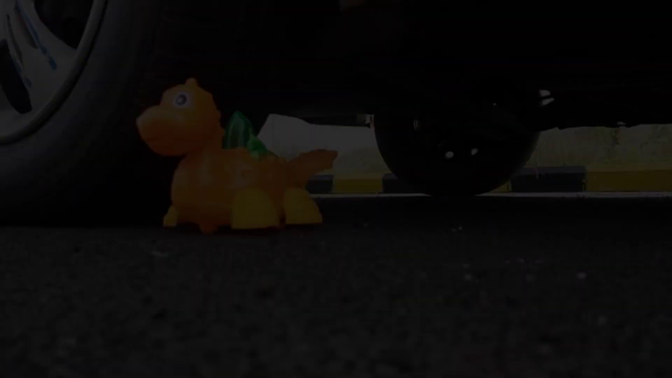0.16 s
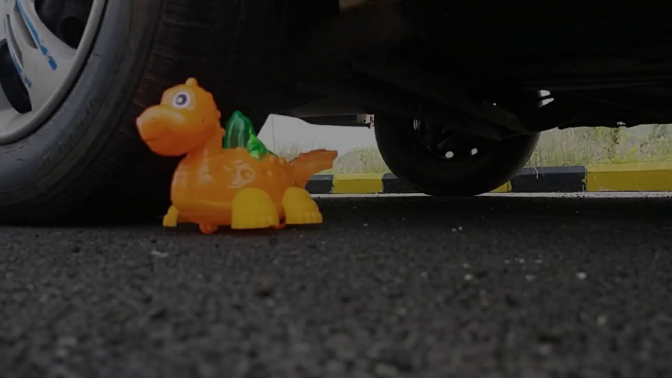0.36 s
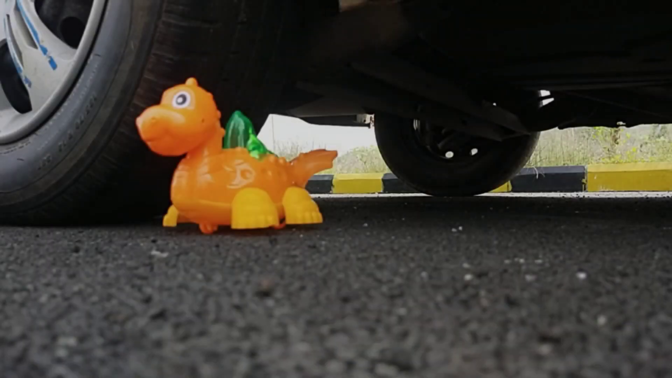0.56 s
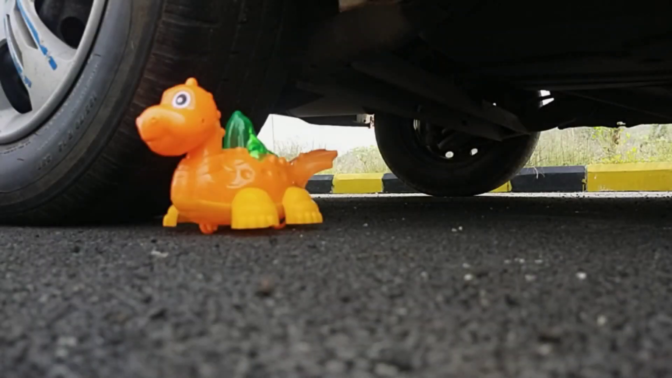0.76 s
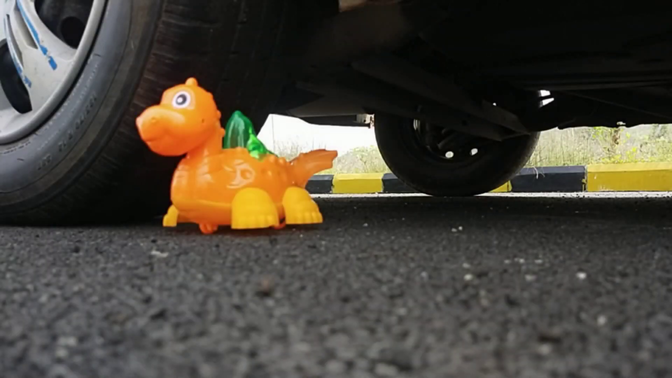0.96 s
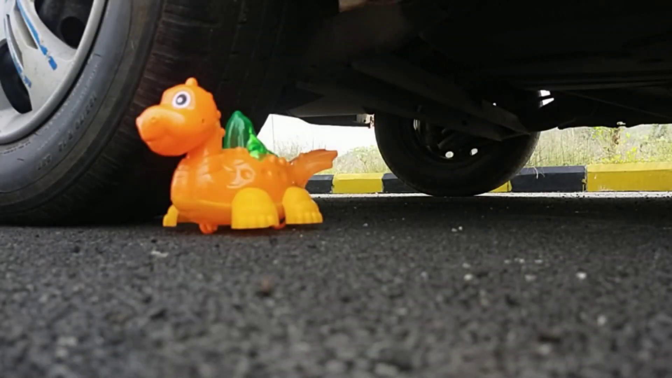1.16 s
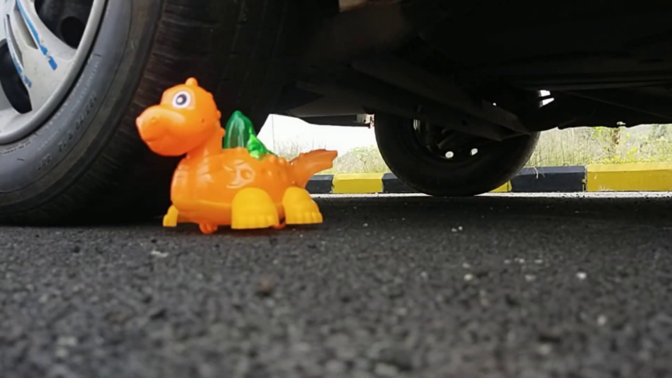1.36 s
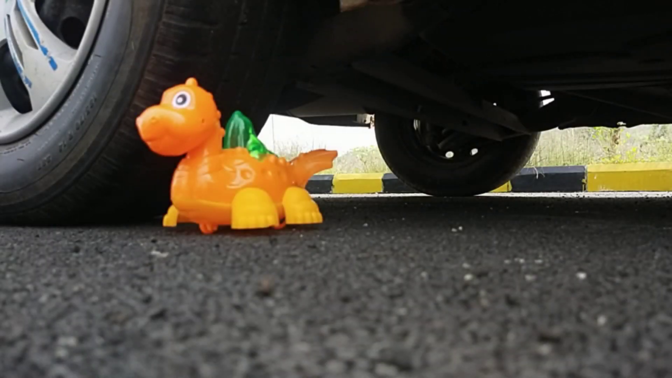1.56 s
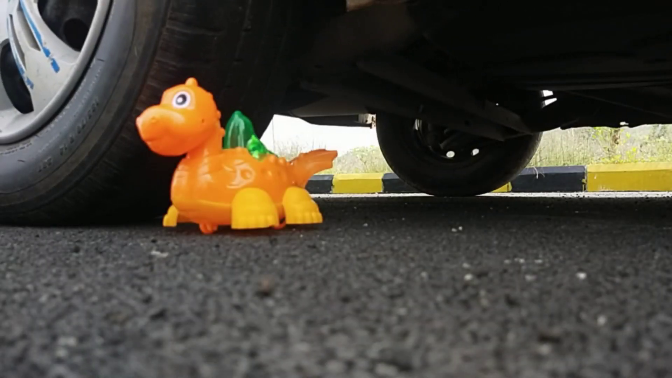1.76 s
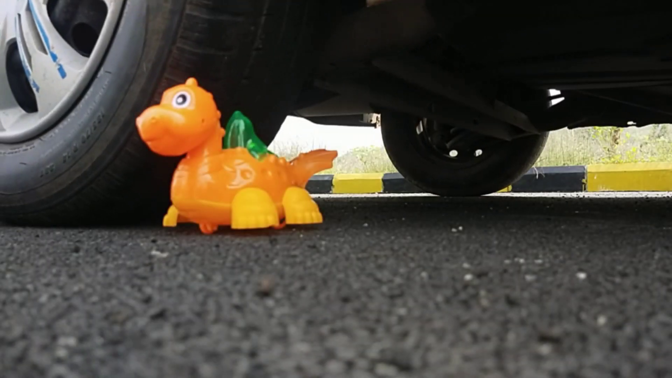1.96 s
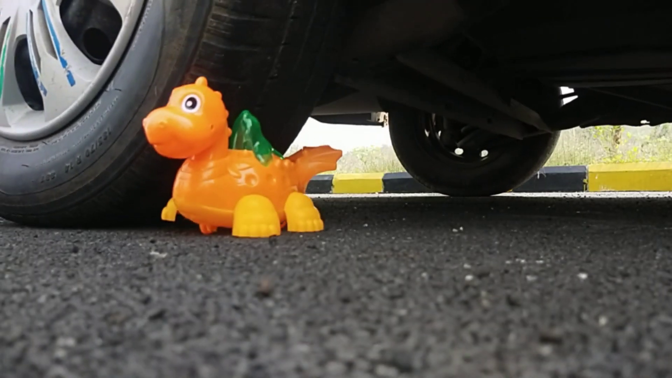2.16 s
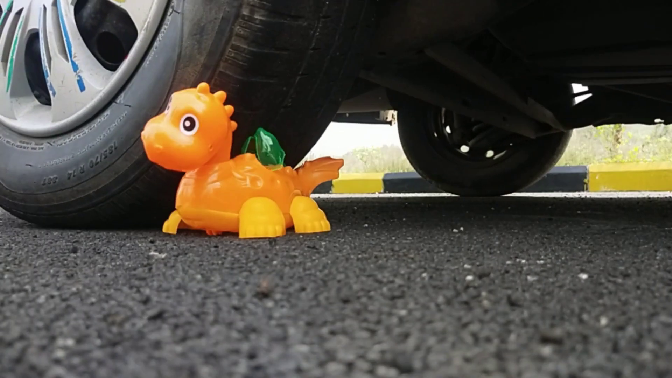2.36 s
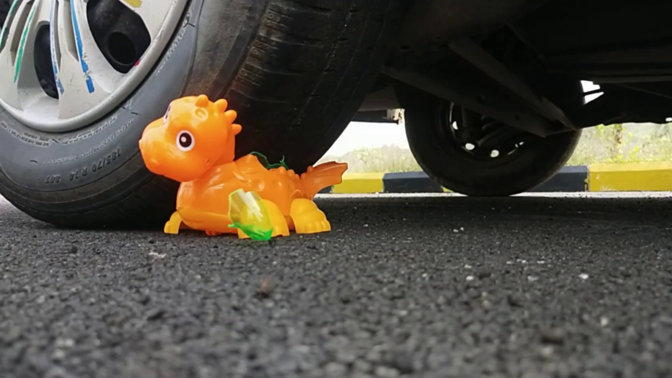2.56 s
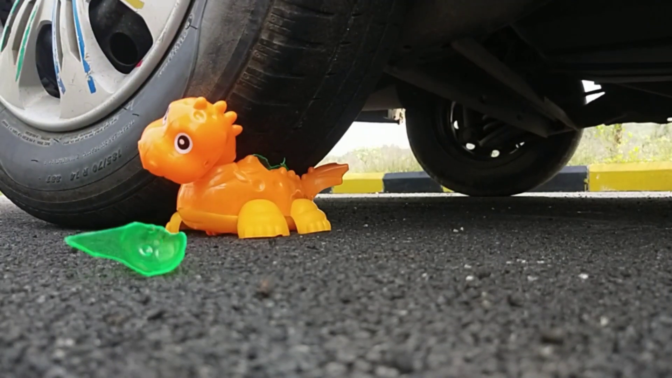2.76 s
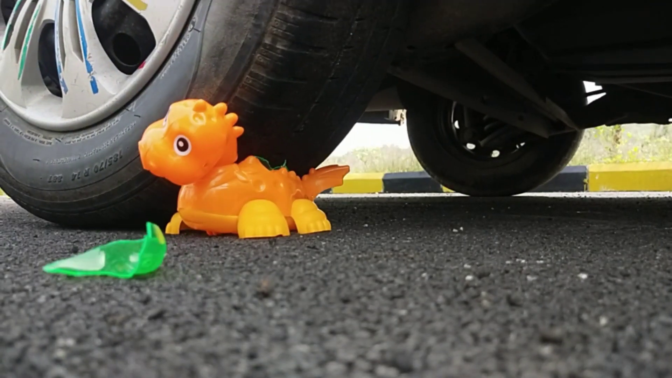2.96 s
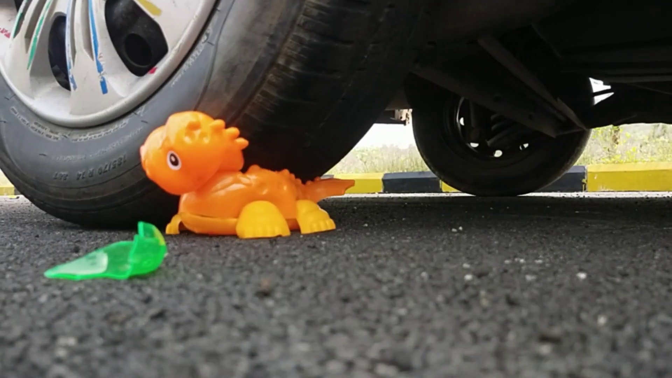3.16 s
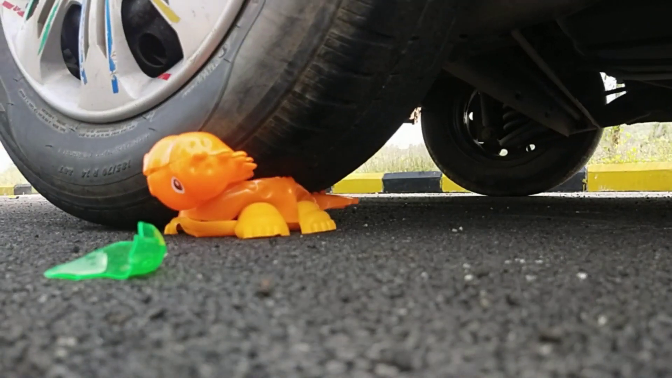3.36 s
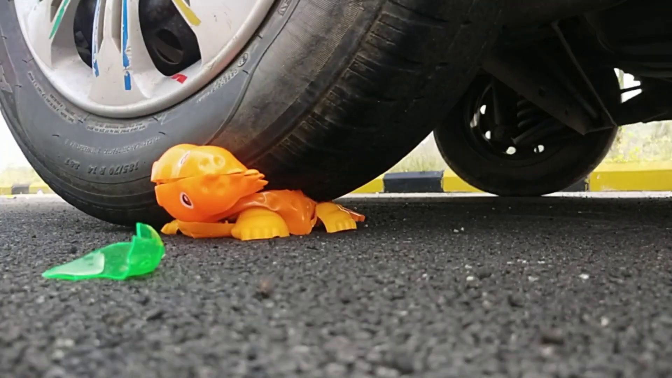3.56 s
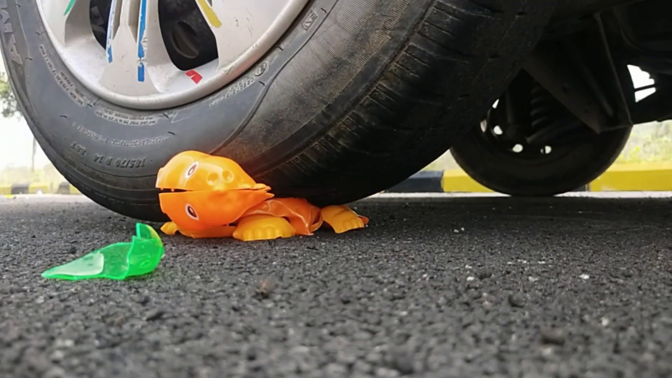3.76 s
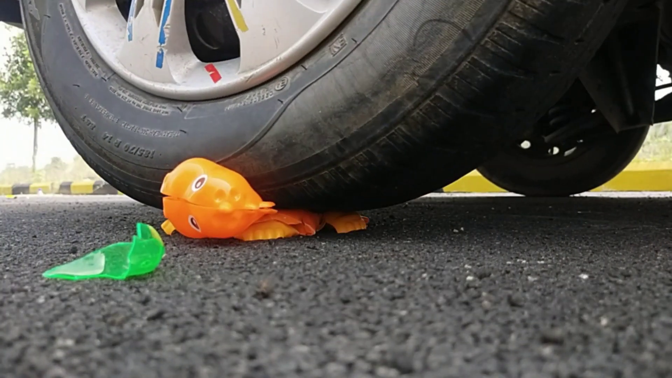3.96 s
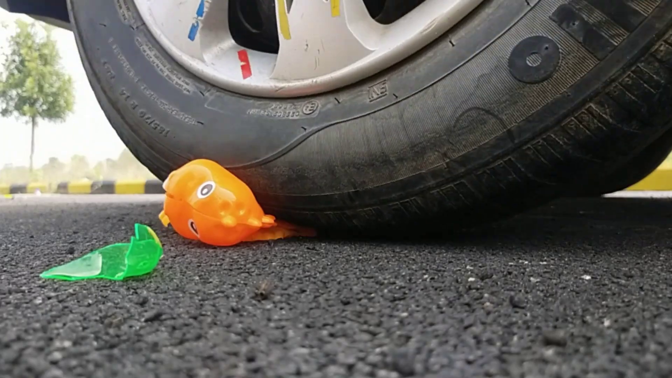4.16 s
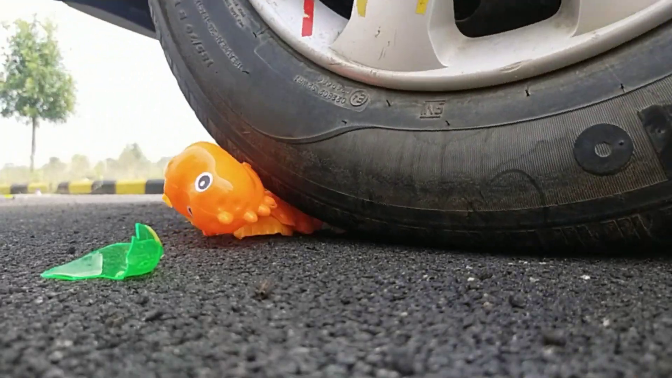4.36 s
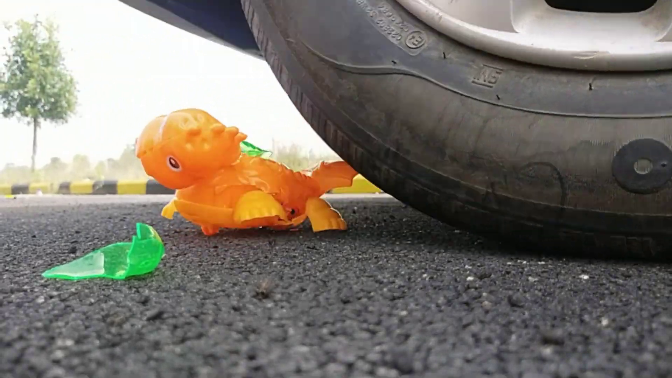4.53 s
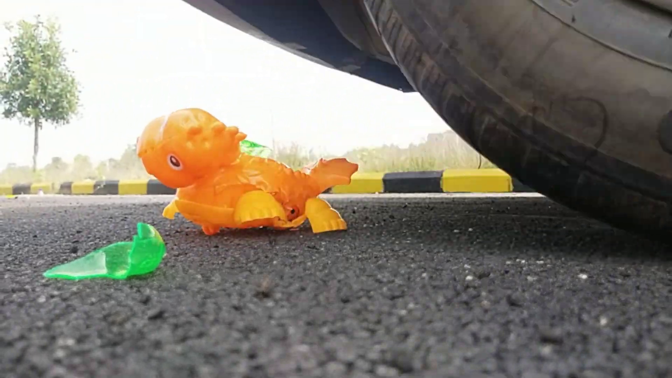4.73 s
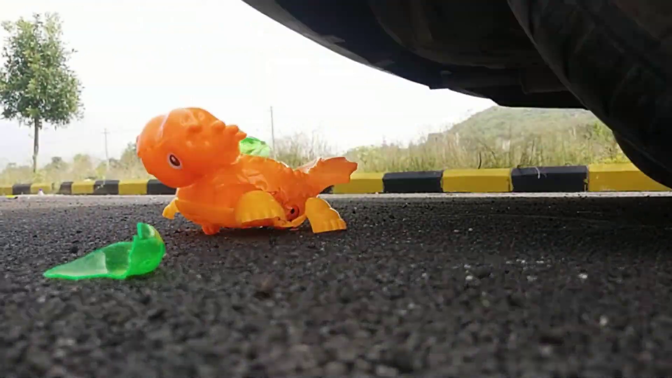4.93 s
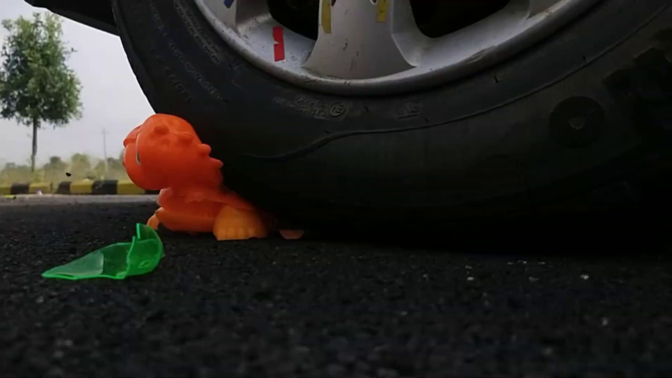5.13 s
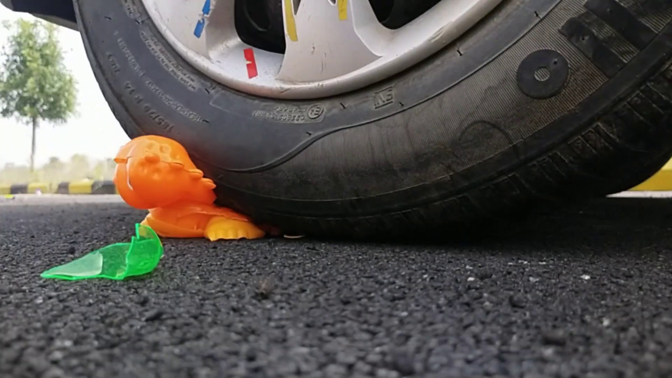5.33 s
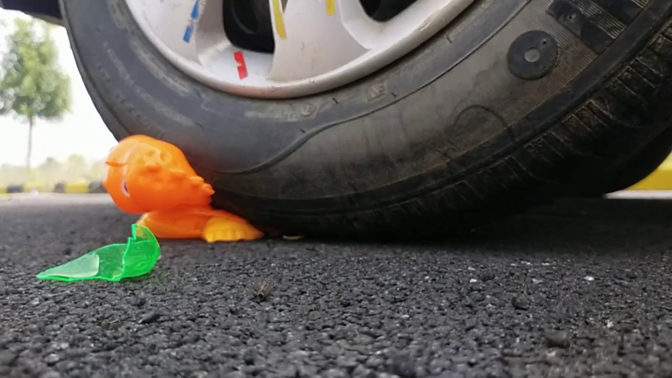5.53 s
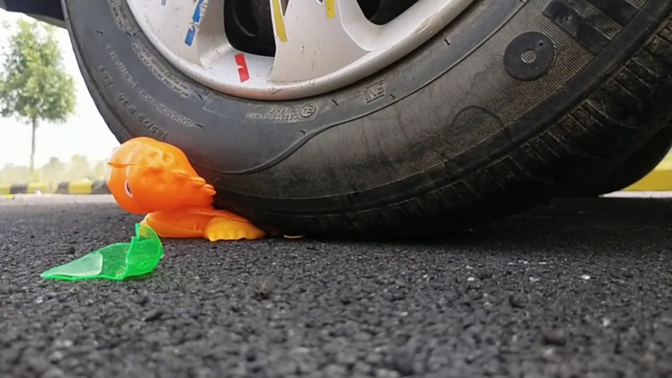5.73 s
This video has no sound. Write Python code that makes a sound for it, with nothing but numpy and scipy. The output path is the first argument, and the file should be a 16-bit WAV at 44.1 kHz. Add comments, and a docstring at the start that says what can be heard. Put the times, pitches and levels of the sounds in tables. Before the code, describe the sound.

An idling car engine fades in with a quiet rumble and clatter. A tyre then rolls over a hollow plastic toy, which breaks in a long run of sharp cracks and crunches, with soft tyre thuds and a shard skittering over the asphalt. The sound drops out for a moment, then returns with a few more cracks over the engine. It is heard outdoors from ground level, close to the toy.

```python
"""An idling four-cylinder car engine fades in, rumbling and clattering. From about 2.2 s a tyre rolls
over a hollow plastic toy: the shell cracks, creaks and crunches, ringing in its modes, the tyre thuds
down, and a shard skitters off over the asphalt. The engine's level dips behind the cracks and jumps
back; everything fades out briefly near 5.2 s. Heard from the ground by two spaced microphone ports."""
import sys
import numpy as np
from scipy import signal
from scipy.fft import rfft, irfft, next_fast_len
from scipy.io import wavfile
from scipy.ndimage import uniform_filter1d

SR = 44100
rng = np.random.default_rng(int(sys.argv[2]) if len(sys.argv) > 2 else 0)


def unload_wav(signal):
    """Save mono or channel-first audio to the path in sys.argv[1] as 16-bit WAV at rate SR, clipped to [-1, 1]."""
    wavfile.write(
        sys.argv[1],
        SR,
        np.round(np.clip(np.atleast_2d(signal).T, -1, 1) * 32767).astype(np.int16),
    )


N = 255339
TIME_S = np.arange(N) / SR


def from_db(db):
    """Level to amplitude gain."""
    return 10 ** (np.asarray(db) / 20)


def unit_rms(x):
    """Scale to rms 1."""
    return x / np.sqrt(np.mean(x ** 2) + 1e-20)


def curves(rows):
    """Interpolate rows of (seconds, values..) to every sample."""
    times_s, *columns = np.transpose(rows)
    return [np.interp(TIME_S, times_s, column) for column in columns]


def db_at(spectrum, hz):
    """Read rows of (Hz, dB) on a log frequency axis."""
    points_hz, points_db = np.transpose(spectrum)
    return np.interp(np.log(hz), np.log(points_hz), points_db)


def nearness(hz, centre_hz, log_width):
    """Bell curve on log frequency, 1 at the centre."""
    return np.exp(-(np.log(hz / centre_hz) / log_width) ** 2)


def ring(force, hz, t60_s):
    """One damped mode: a unit click rings at height 1."""
    r = from_db(-60 / (t60_s * SR))
    w = 2 * np.pi * min(hz, .45 * SR) / SR
    denormal_guard = 1e-18 * (np.arange(force.shape[-1]) % 3)
    return signal.lfilter([1, 0, -1], [1, -2 * r * np.cos(w), r * r], force + denormal_guard) / 2


def swell(clicks, rise_s):
    """Spread each click into a soft rise and fall."""
    r = np.exp(-1 / (rise_s * SR))
    return signal.lfilter([1], [1, -2 * r, r * r], clicks)


def stereo_noise(shape, correlation):
    """Left and right white noise with a shared part."""
    mid, side = rng.standard_normal((2, 1) + shape)
    correlation = np.clip(correlation, 0, 1)
    mid, side = np.sqrt(1 + correlation) * mid, np.sqrt(1 - correlation) * side
    return np.concatenate([mid + side, mid - side]) / np.sqrt(2)


# Engine timing. Each row: start in seconds, time of one loudest knock in seconds, cycle in seconds.
FIRING_CYCLES = [(0, .953, .1008), (2.6, 2.766, .1008), (4.0, 4.056, .1008), (4.6, 4.851, .098),
                 (5.2, 5.686, .1008)]
# Each entry: one cylinder's level in dB, in firing order.
CYLINDER_LEVELS_DB = [0, -6, -8, -3.5]

def firings():
    """One click per firing, four to a cycle, slightly uneven in time and strength."""
    train = np.zeros(N)
    ends_s = [row[0] for row in FIRING_CYCLES[1:]] + [N / SR]
    for (start_s, knock_s, cycle_s), end_s in zip(FIRING_CYCLES, ends_s):
        step_s = cycle_s / 4
        k = np.arange(np.ceil((start_s - knock_s) / step_s), (end_s - knock_s) / step_s - 1).astype(int)
        jitter_s, scatter_db = (rng.standard_normal((len(k), 2)) * [.0008, .7]).T
        at = ((knock_s + k * step_s + jitter_s) * SR).astype(int)
        train[np.clip(at, 0, N - 1)] = from_db(np.array(CYLINDER_LEVELS_DB)[k % 4] + scatter_db)
    return train


# Each row: frequency in Hz, left minus right in dB.
ENGINE_BALANCE = [(60, -3), (180, -1), (550, -0.5), (1650, -9), (4970, -9), (15000, -5.5)]
ENGINE_CORRELATION, ENGINE_LAG_SAMPLES = 0.85, 22

def engine_colour(noise, spectrum):
    """Lay a spectrum and the engine's stereo balance on noise; rms 1."""
    size = next_fast_len(N, True)
    hz = np.maximum(np.fft.rfftfreq(size, 1 / SR), 1)
    balance_db = db_at(ENGINE_BALANCE, hz) / 2 * [[1], [-1]]
    shaped = rfft(noise, size) * from_db(db_at(spectrum, hz) + balance_db)
    return unit_rms(irfft(shaped, size)[:, :N])


# Each row: frequency in Hz, relative spectral density in dB.
RUMBLE_SPECTRUM = [(15, -53.5), (25, -7.5), (87, 0), (193, 1), (277, -10.5), (668, -1.5), (784, -12.5),
                   (1460, -20), (1610, -41), (2310, -45), (3000, -44), (3900, -67), (6600, -120)]

def rumble(throb):
    """Low noise that throbs gently with the firings."""
    noise = stereo_noise((N,), ENGINE_CORRELATION)
    return from_db(-3.5) * engine_colour(noise * (1 + 0.17 * throb), RUMBLE_SPECTRUM)


# Each row: frequency in Hz, relative spectral density in dB.
CLATTER_SPECTRUM = [(240, -38), (400, -2.5), (669, 0), (899, -3.5), (1460, -6), (1620, -14), (2360, -17),
                    (3120, -19.5), (4190, -16.5), (5640, -27), (7010, -20.5), (8450, -39.5), (14600, -38),
                    (15500, -41), (16500, -85)]

def clatter(train, throb):
    """Metallic noise in bursts; the treble follows mainly the loudest knock."""
    knock = unit_rms(swell(train ** 2, rise_s=.007))
    metal = stereo_noise((N,), ENGINE_CORRELATION)
    treble = signal.sosfilt(signal.butter(2, 5200, "high", fs=SR, output="sos"), metal)
    bursts = (metal - treble) * (0.54 + 0.5 * throb + 0.5 * knock) + treble * (1.02 + 0.63 * knock)
    return from_db(-9.5) * engine_colour(bursts, CLATTER_SPECTRUM)


# Each row: frequency in Hz, nominal width in Hz, relative level in dB, exponent on the drive.
PIPE_MODES = [(110.5, 29.5, -12, 1.21), (182.7, 86, -11, 0.052), (1252, 45, -22, 1.47)]

def exhaust(train, throb, drive):
    """Gas flow and firings ring the pipe: low modes hum on, high ones chug."""
    flow, out = stereo_noise((N,), ENGINE_CORRELATION), 0
    for hz, width_hz, db, exponent in PIPE_MODES:
        puffs = flow * (1.5 + hz / 500 * throb) + 8 * train
        out += from_db(db) * drive ** exponent * unit_rms(ring(puffs, hz, 2.84 / width_hz))
    return out


# Each row: frequency in Hz, nominal width in Hz, relative level in dB, cylinder contrast exponent.
BLOCK_MODES = [(1400, 300, -24, 2.2), (2300, 350, -29, .5), (3950, 240, -35, 1.8)]

def engine_block(train):
    """Each firing is a short rasp coloured by the block's resonances."""
    out = 0
    for hz, width_hz, db, contrast in BLOCK_MODES:
        rasp = swell(train ** contrast, rise_s=.0028) * stereo_noise((N,), ENGINE_CORRELATION)
        out += from_db(db) * unit_rms(ring(rasp, hz, 2.5 / width_hz))
    return out


# Each row: start in seconds, end in seconds, depth at mid-dip in dB.
LEVEL_DIPS = [(2.165, 2.278, 7), (2.37, 2.414, 14), (2.417, 2.553, 13.5), (2.558, 2.609, 15.5),
              (2.672, 2.749, 10.5), (2.995, 3.101, 17.5), (3.098, 3.156, 15), (3.208, 3.334, 11),
              (3.339, 3.42, 11), (3.426, 3.516, 15.5), (3.512, 3.62, 3), (3.634, 3.68, 9.5),
              (3.7, 3.721, 14), (3.707, 3.824, 9), (3.816, 3.92, 8.5), (3.954, 3.997, 11), (4.2, 4.252, 10),
              (5.491, 5.542, 11)]
SAG_DB_PER_S = 34

def level_dips():
    """Attenuation in dB: each dip deepens as it lasts, then the level jumps back."""
    dip_db = np.zeros(N)
    for start_s, end_s, depth_db in LEVEL_DIPS:
        inside = (TIME_S >= start_s) & (TIME_S < end_s)
        dip_db += inside * (depth_db + SAG_DB_PER_S * (TIME_S - (start_s + end_s) / 2))
    return uniform_filter1d(dip_db, size=90)


# Each row: time in seconds, overall gain in dB, extra clatter and block gain in dB, exhaust drive in dB.
ENGINE_LEVELS = [(0, -40, 4, 6), (.8, -41, 4.5, -0.5), (2.15, -41, 4.5, 0.5), (2.75, -38, 7.5, 1),
                 (2.9, -36, 2, 2.5), (3.0, -29, -1.5, -9), (3.18, -32, -1, 1), (3.6, -37, 5, 1),
                 (4.0, -32, -4, -9), (4.2, -33.5, -1.5, 3), (4.27, -34, -0.5, 3.5), (4.65, -47, 8.5, 16.5),
                 (5.05, -46.5, 9.5, 13), (5.25, -49.5, 11, 7), (5.4, -42.5, 13, 10.5), (5.6, -43.5, 9, 9),
                 (5.7, -36, 2.5, -1)]

def engine(dip_db):
    """The engine as the car rolls; clatter, block and exhaust dip less than the rumble."""
    gain_db, clatter_db, drive_db = curves(ENGINE_LEVELS)
    train = firings()
    throb = unit_rms(swell(train, rise_s=.0048))
    low, metal = rumble(throb), clatter(train, throb)
    pipe = exhaust(train, throb, drive=from_db(drive_db + 0.11 * dip_db))
    metal = from_db(clatter_db + 0.31 * dip_db) * (metal + engine_block(train))
    left, right = from_db(gain_db - dip_db) * (low + metal + pipe)
    return np.array([np.roll(left, ENGINE_LAG_SAMPLES), right])  # the right port is nearer


# Each row: frequency in Hz, left minus right in dB.
TOY_BALANCE = [(60, 2.5), (180, 1), (550, 0.0), (1650, -1), (4970, 0.5), (15000, 4)]

def toy_ports(hz):
    """Correlation and gains at the two ports for a sound from the toy."""
    return .7 - hz / 15000, from_db(db_at(TOY_BALANCE, hz) / 2 * np.array([[1], [-1]]))


def strikes(times_s, levels_db, modes, weight_db, snap_s, rattle_s, rattle_db, pan_db=0, size=1500):
    """Each blow, a short snap with a grainy rattle, drives every mode with its own strength."""
    count, lead = len(times_s), 220  # samples ahead of the snap
    t, hit = (np.arange(size) - lead) / SR, slice(lead, lead + 500)
    grain = from_db(4 * np.minimum(rng.exponential(1, (count, size)), 4) - 8)
    rattle = from_db(rattle_db).reshape(-1, 1) * np.exp(-np.maximum(t / rattle_s, -t / 0.0012)) * grain
    snap = np.maximum(t, 0) / snap_s * np.exp(1 - t / snap_s)
    snap *= np.sqrt(np.sum(snap ** 2)) / np.sum(snap)
    sides, out = np.array([[[1]], [[-1]]]), np.zeros((2, N))
    for hz, mode_db, t60_s in modes:
        correlation, port_gains = toy_ports(hz)
        phase, polarity, scatter = rng.standard_normal((count, 3)).T
        skew = np.arccos(np.clip(correlation, 0, 1)) / 2 * phase[:, None] * sides  # ports out of step
        blows = stereo_noise(rattle.shape, correlation) * rattle / (1 + hz / 6000)
        carrier = np.sign(polarity[:, None]) * np.cos(2 * np.pi * hz * t[hit] + skew)
        blows[..., hit] += 2 * snap[hit] * carrier
        blows *= from_db(sides * pan_db / 2)
        gains = from_db(levels_db + mode_db + weight_db(hz) + 1.86 * scatter)
        force = np.zeros((2, N + 2 * size))
        for k, start_s in enumerate(times_s):
            at = int(start_s * SR + 12 * abs(polarity[k]))  # modes start slightly apart
            force[:, at:at + size] += gains[k] * blows[:, k]
        out += port_gains * ring(force[:, lead:N + lead], hz, t60_s)
    return out


# Each row: start in seconds, relative level in dB.
TYRE_DROPS = [(2.286, -21), (2.352, -24), (3.024, -20), (3.094, -12.5), (3.922, -23), (3.935, -13.5)]
# Each row: frequency in Hz, relative level in dB, t60 in seconds.
TYRE_MODES = [(115, 2, 0.017), (246, 0, 0.019)]

def tyre_thuds():
    """The tyre drops a little as the toy gives way."""
    times_s, levels_db = np.transpose(TYRE_DROPS)
    return strikes(times_s, levels_db, TYRE_MODES, lambda hz: -21,
                   snap_s=0.00066, rattle_s=.005, rattle_db=-30)


def creak(peak_s=4.184, sigma_s=0.0081, sweep_hz=(520, 848), peak_db=-35):
    """The squeezed shell slips on the rubber, quicker and quicker."""
    sigmas = (TIME_S - peak_s) / sigma_s
    hz = np.interp(sigmas, [-2, 2], sweep_hz)
    return from_db(peak_db) * np.exp(-sigmas ** 2 / 2) * np.sin(2 * np.pi * np.cumsum(hz) / SR)


# Each row: start in seconds, relative level in dB, favoured frequency in Hz.
SHARD_LANDINGS = [(2.511, -34.5, 4270), (2.549, -25, 3340), (2.607, -25, 4230), (2.751, -29, 14300),
                  (2.771, -23.5, 4270), (2.824, -29.5, 8300)]
# Each row: frequency in Hz, relative level in dB, t60 in seconds.
SHARD_MODES = [(1591, -9, 0.16), (2980, -12, 0.043), (3323, -6, .03), (3680, -9, 0.055), (4200, -2, 0.044),
               (7050, -5, 0.018), (8360, -10.5, 0.014), (12480, -10, .006), (14400, -3, 0.0091)]

def shard():
    """A loose shard bounces on asphalt, ringing longer than the shell; each landing favours one mode."""
    times_s, levels_db, favoured_hz = np.transpose(SHARD_LANDINGS)
    weight_db = lambda hz: -22 + 9 * nearness(hz, favoured_hz, log_width=.08)
    return strikes(times_s, levels_db, SHARD_MODES, weight_db,
                   snap_s=0.00032, rattle_s=0.013, rattle_db=-8, size=2600)


# The toy's shell. Each row: frequency in Hz, relative level in dB, t60 in seconds.
SHELL_MODES = [(381, -5, 0.013), (555, -3, 0.01), (714, -4, 0.014), (1005, 1, 0.0055), (1298, -1, 0.0061),
               (1763, 1.5, 0.0027), (2487, 6, 0.0014), (3010, 0.5, 0.004), (3594, 1, 0.0036),
               (4360, 5, 0.0018), (5180, -0.5, 0.0023), (6310, 0, 0.0021), (7056, 6.5, 0.0018),
               (9060, -1.5, 0.0016), (10750, 0, 0.00095), (12300, -4.5, 0.0033), (14360, 1.5, 0.0018)]
# Each row: time in seconds, gain of the shell's modes above 10 kHz in dB.
SHELL_TREBLE = [(2.2, -11), (2.3, 3.5), (2.5, 8), (2.7, -0.5), (3.9, -3.5), (4.3, -4.5), (4.6, -5),
                (5.5, -3)]
# Each row: peak time in seconds, level in dB, 1/e fall time in seconds.
CRUNCH_BURSTS = [(2.297, -33.5, .015), (2.45, -48, 0.029), (2.555, -32, 0.021), (2.615, -45, 0.073),
                 (3.176, -42, 0.045), (3.53, -45.5, 0.078), (3.651, -46, 0.03), (3.73, -44, 0.032),
                 (3.869, -50, 0.039), (4.03, -51.5, 0.16), (4.33, -37.5, 0.048), (4.385, -33, .03),
                 (4.425, -21.5, 0.016), (4.49, -40, 0.13), (5.26, -42, 0.036), (5.38, -45, 0.031),
                 (5.56, -41.5, 0.03)]

def crunch(dip_db):
    """Small fractures, scraping and grit under the tyre: random clicks ring the shell's upper modes."""
    level = sum(from_db(db) * np.exp(-np.maximum((TIME_S - s) / fall_s, (s - TIME_S) / (.45 * fall_s)))
                for s, db, fall_s in CRUNCH_BURSTS)
    clicks_per_s = 500 + 2200 * (level / from_db(-42)) ** .6  # harder crushing, denser clicks
    sizes = from_db(3 * np.minimum(rng.exponential(1, N), 4)) / np.sqrt(clicks_per_s)
    is_click = rng.random(N) < clicks_per_s / SR
    treble_gain = from_db(curves(SHELL_TREBLE)[0])
    out, max_clicks = 0, N // 16
    for hz, db, t60_s in SHELL_MODES[3:]:
        correlation, port_gains = toy_ports(hz)
        strengths = from_db(3 * rng.standard_normal(max_clicks)) * stereo_noise((max_clicks,), correlation)
        clicks = np.zeros((2, N))
        clicks[:, is_click] = sizes[is_click] * strengths[:, :is_click.sum()]
        if hz > 10000:
            clicks *= treble_gain
        out += from_db(db) / (1 + hz / 16100) * port_gains * ring(clicks, hz, t60_s)
    return level * from_db(-0.73 * dip_db) * unit_rms(out)


# Each row: start in seconds, relative level in dB, offsets in dB for belly (low modes), walls (middle),
# edge (high) and rattle, pitch of the breaking piece in Hz.
SHELL_CRACKS = [(2.179, -11, -12.5, -4, -25, -14, 2770), (2.207, -9.5, -18.5, -4, -3.5, -16, 970),
                (2.2666, -23, -8, -1.5, 4, -14, 1300), (2.2792, -16, -8.5, 2, -1, -13, 1167),
                (2.286, -12, -9, 4, -5, -12.5, 930), (2.337, -26, -11, 4, 3, -0.5, 3180),
                (2.3524, -12.5, -1.5, 5, -2, -15.5, 1090), (2.415, -13, -10, 4, 0, -8.5, 3230),
                (2.4346, -16.5, -19, -8, -15, -7, 1020), (2.4833, -10, -9.5, -9.5, -8.5, -16, 984),
                (2.53, -37.5, -4, 19.5, -3, -6.5, 1090), (2.5353, -32, -11, -6, -1, -7, 1020),
                (2.6704, -13, -17, -1.5, -13, -10.5, 1260), (2.685, -12, -16, -13, -8.5, -23, 1027),
                (2.7186, -24.5, -13, 4.5, -6, -23, 3300), (3.0021, -18.5, -6, -3, 6.5, -11.5, 4300),
                (3.025, -5.5, -3, -12, -8.5, -35, 830), (3.0419, -26.5, -12, 2.5, 10, -14.5, 1250),
                (3.094, -14, -1.5, 7.5, 6.5, -16, 1080), (3.1955, -21, -4.5, -5, 5, -5.5, 1131),
                (3.2089, -16.5, -7, -1, -4, -14.5, 1263), (3.2517, -14, -3, -13, 4, -12, 3260),
                (3.2673, -9, -5.5, -7.5, -3, -7, 1230), (3.2727, -7.5, -7, -12, -7.5, -19, 1320),
                (3.3297, -20, 4.5, 6, 5, -10.5, 613), (3.3666, -14, -26, 8, -1.5, -18, 2900),
                (3.419, -10, -6, 5.5, -0.5, -17.5, 2690), (3.4303, -17, -1, -4, 0, -14, 1050),
                (3.461, -11, -6.5, 3, 4, -19.5, 2940), (3.5241, -24.5, 5, 0, -22, -16, 1270),
                (3.5487, -8.5, -12, -2.5, -5, -13, 3053), (3.5551, -14.5, -29, -2, -5, -32, 3600),
                (3.5913, -25.5, 0, 1, -4, -15, 1110), (3.6159, -5.5, -6.5, -9.5, -2.5, -19, 1296),
                (3.6462, -26, -26, -2, 0, -2, 3500), (3.6834, -29, 6, -16, 11, -22, 643),
                (3.7037, -23, -5, -11, -4, -18, 633), (3.71, -12.5, 9, -12, 4.5, -12, 618),
                (3.7191, -15, -10, -7, -6.5, -22, 3140), (3.7739, -12.5, -7, -11, -10, -13.5, 4140),
                (3.8123, -17, 5.5, -4, 9.5, -12.5, 572), (3.854, -25.5, -3, -31, -2, -6, 598),
                (3.886, -23, 3, -40, -10, -15, 4520), (3.922, -14.5, -13.5, -32, -7, -5, 611),
                (3.933, -9.5, 2, -2.5, 8.5, -15, 766), (4.003, -22.5, -1.5, -17, 2.5, -7, 504),
                (4.0658, -40.5, -22, -14, 15, -1.5, 2886), (4.2535, -30, -21.5, 2, 1, -8, 1430),
                (4.267, -33.5, -12, -14, 12.5, -10, 517), (4.2887, -31, -18, -4, 0, -11, 1252),
                (4.317, -23, -36, 4.5, 2, -1.5, 1424), (4.3268, -8.5, -32, -16, -9.5, -30, 1485),
                (4.3616, -14.5, -36.5, -8, -28.5, -23, 1477), (4.3773, -21, -31, 9.5, -16, -14, 1400),
                (4.4033, -12, -4.5, -10, 8.5, -8, 3263), (4.4129, -11, -52, -1, -12, -6, 1210),
                (4.472, -24, -19.5, 3, 7, -12, 1240), (4.5131, -19.5, -19, 0, 7, -9, 1503),
                (4.5394, -35.5, -17, 3.5, 10, 1.5, 1240), (4.6339, -32, -20, -3, 8, -5, 1276),
                (5.202, -25, -10, 6, 13.5, -15.5, 3120), (5.2539, -26.5, 5, -5, 13.5, -5.5, 3700),
                (5.2804, -22, -8, 0, -8, -14, 930), (5.3524, -18, -17, -1, -10, -11, 678.5),
                (5.4251, -13, -16, -8.5, -18, -9, 1520), (5.4993, -9.5, -29, -4.5, -2, -34, 1450),
                (5.5505, -22.5, -18, 4, -37, -7.5, 3100)]
LOWEST_BAND_CAP_DB, PIECE_RING_DB, PIECE_T60_CYCLES = 2.5, -3.5, 14

def cracks():
    """Each fracture strikes the shell's modes; the breaking piece's pitch stands out and rings on."""
    times_s, levels_db, belly_db, walls_db, edge_db, rattle_db, piece_hz = np.transpose(SHELL_CRACKS)
    lowest_db = np.minimum(belly_db, LOWEST_BAND_CAP_DB)
    top_db = edge_db + np.interp(times_s, *np.transpose(SHELL_TREBLE))
    bands_hz = [390, 600, 1400, 3300, 8000, 11000]
    bands_db = np.column_stack([lowest_db, belly_db, walls_db, np.zeros(len(times_s)), edge_db, top_db])

    def weight_db(hz):
        shape_db = np.array([np.interp(np.log(hz), np.log(bands_hz), row) for row in bands_db])
        return shape_db + 9.5 * nearness(hz, piece_hz, log_width=.13) - 17.5

    pan_db = 3 * rng.standard_normal((len(times_s), 1))
    out = strikes(times_s, levels_db, SHELL_MODES, weight_db,
                  snap_s=0.00032, rattle_s=0.0073, rattle_db=rattle_db, pan_db=pan_db)
    t = np.arange(1500) / SR
    for k, (start_s, db, hz) in enumerate(zip(times_s, levels_db, piece_hz)):
        at = int(start_s * SR)
        ring_db = db + weight_db(hz)[k] + PIECE_RING_DB - 60 * t * hz / PIECE_T60_CYCLES
        out[:, at:at + len(t)] += from_db(ring_db) * np.sin(2 * np.pi * hz * t + [[0], [.6]])
    return out


# Each row: fade-out start, fade-out end, fade-in start, fade-in end, all in seconds.
FADE_TIMES = [(-1.57, 0.13, 0.072, 1.106), (5, 5.172, 5.185, 5.225)]

def fades(exponent=1.64, floor_db=-61):
    """Overall gain: near silence at the start and again briefly near 5.2 s."""
    gain = 1
    for out_start, out_end, in_start, in_end in FADE_TIMES:
        falling = (out_end - TIME_S) / (out_end - out_start)
        rising = (TIME_S - in_start) / (in_end - in_start)
        gain *= np.clip(np.maximum(falling, rising), 0, 1)
    return gain ** exponent + from_db(floor_db)


def scene():
    """Engine, tyre and toy under the fades."""
    dip_db = level_dips()
    return (engine(dip_db) + cracks() + tyre_thuds() + shard() + creak() + crunch(dip_db)) * fades()


def record(dry):
    """The microphone drops the deepest bass, rounds the tallest peaks and cuts the top."""
    low_cut_hz, stopband_hz, ceiling = 45, 16900, .85
    thinned = signal.sosfilt(signal.butter(2, low_cut_hz, "high", fs=SR, output="sos"), dry)
    rounded = ceiling * np.tanh(thinned / ceiling)
    return signal.sosfilt(signal.cheby2(12, 70, stopband_hz, fs=SR, output="sos"), rounded)


dry = scene()
out = record(dry)
unload_wav(out)
```